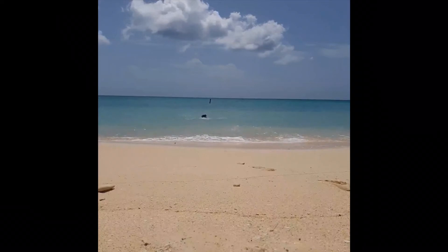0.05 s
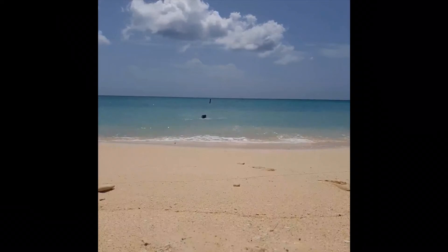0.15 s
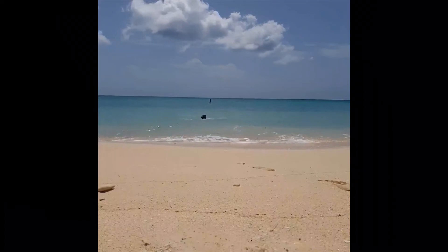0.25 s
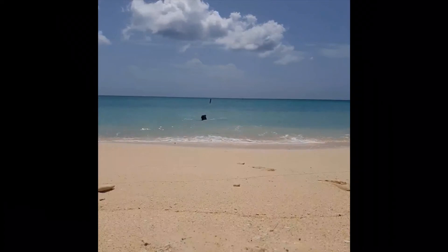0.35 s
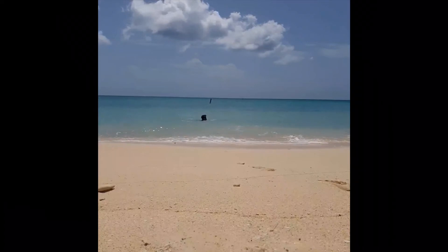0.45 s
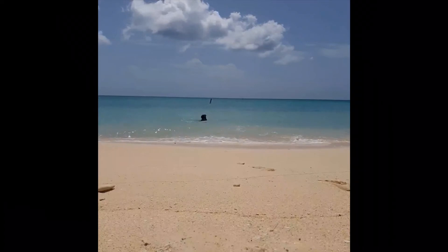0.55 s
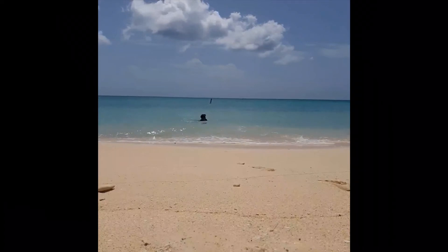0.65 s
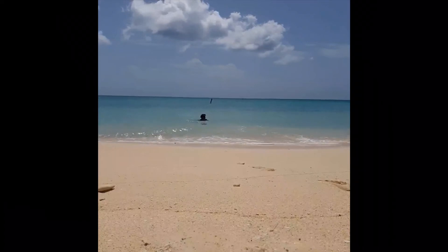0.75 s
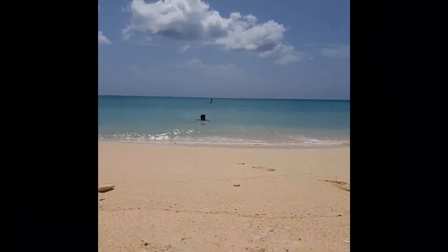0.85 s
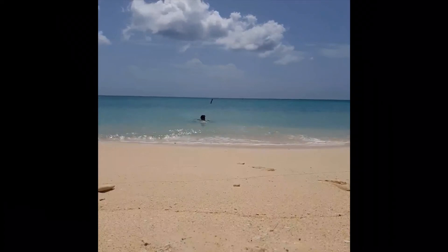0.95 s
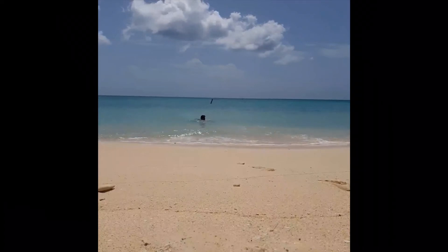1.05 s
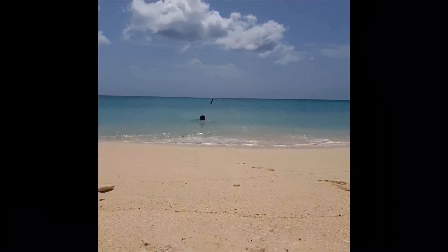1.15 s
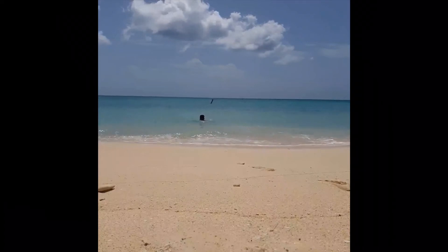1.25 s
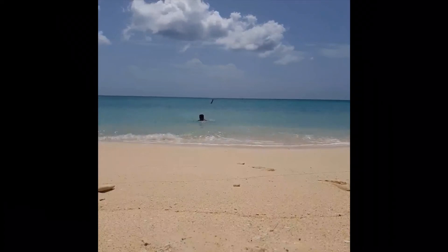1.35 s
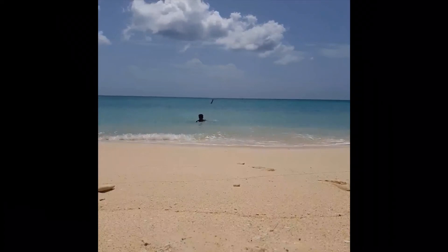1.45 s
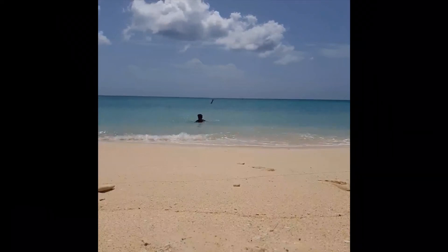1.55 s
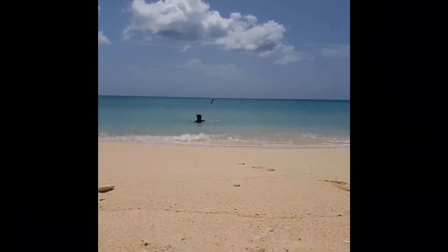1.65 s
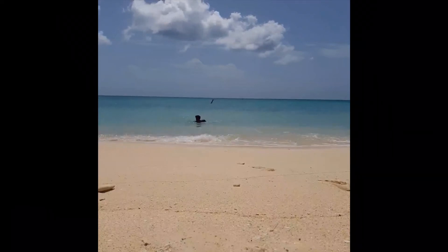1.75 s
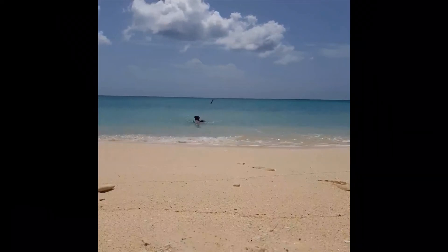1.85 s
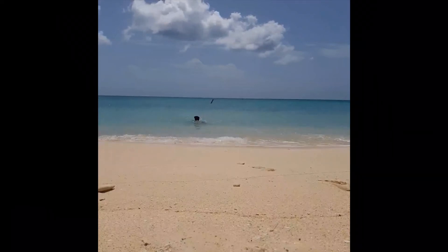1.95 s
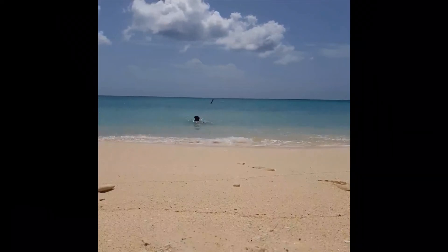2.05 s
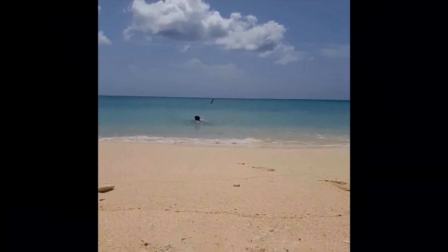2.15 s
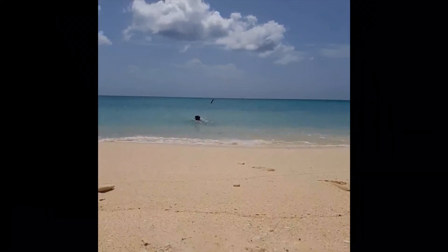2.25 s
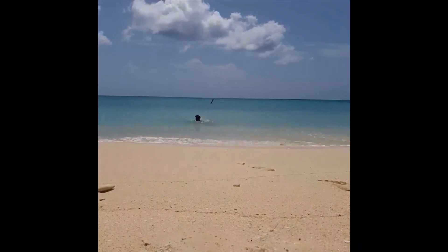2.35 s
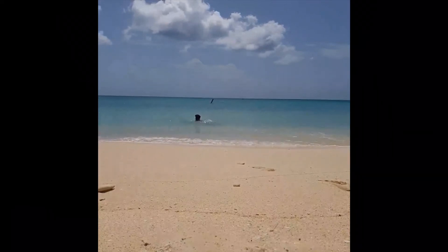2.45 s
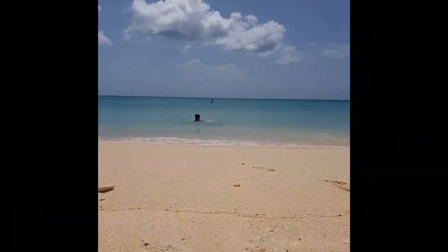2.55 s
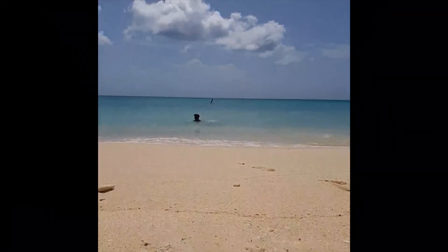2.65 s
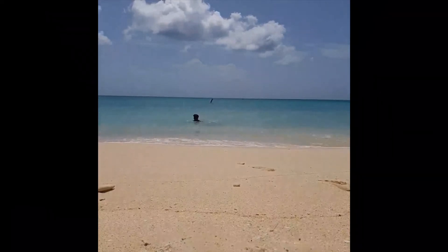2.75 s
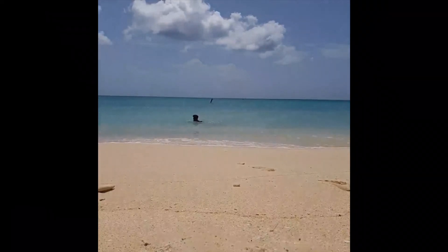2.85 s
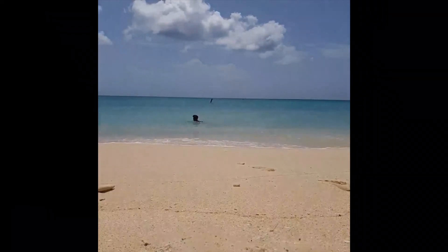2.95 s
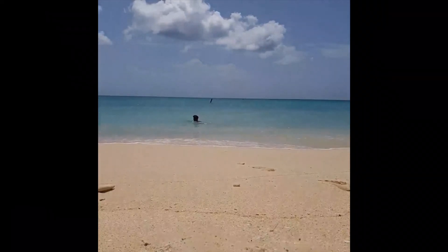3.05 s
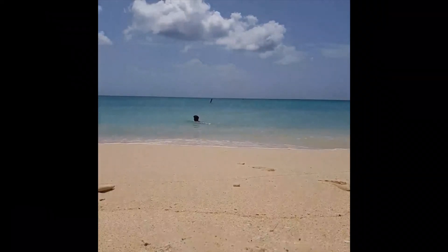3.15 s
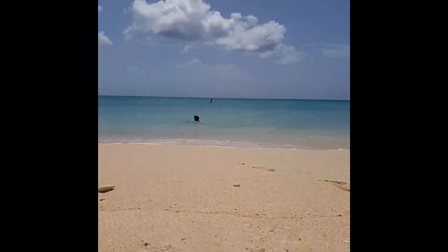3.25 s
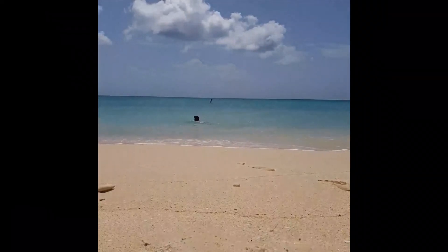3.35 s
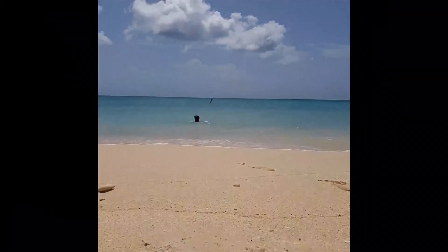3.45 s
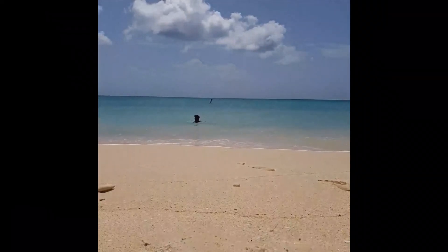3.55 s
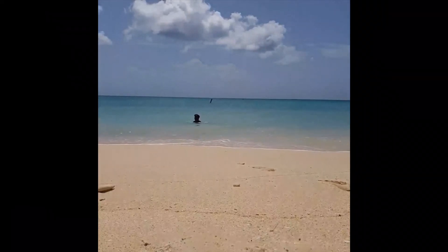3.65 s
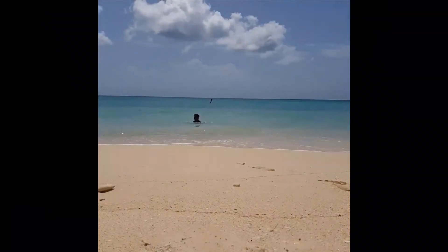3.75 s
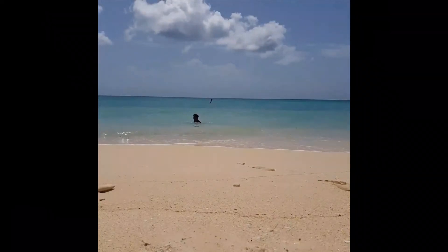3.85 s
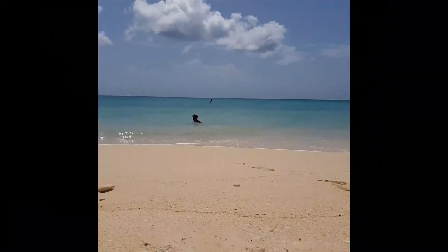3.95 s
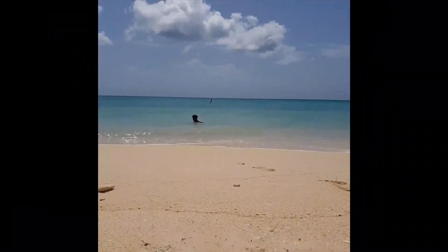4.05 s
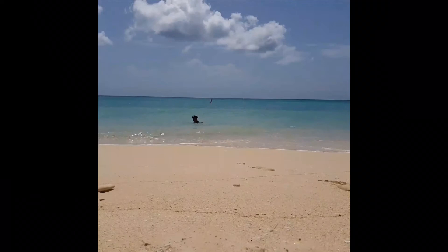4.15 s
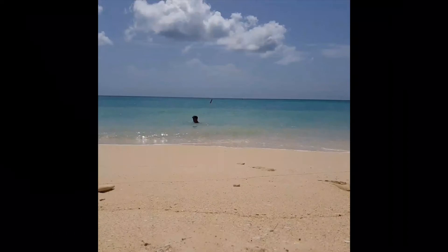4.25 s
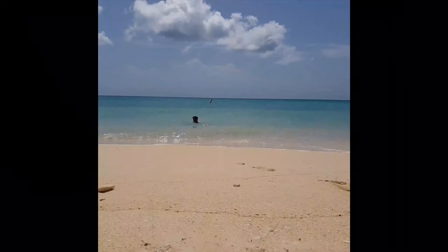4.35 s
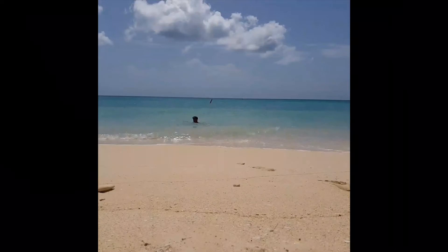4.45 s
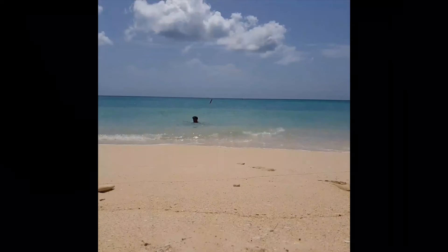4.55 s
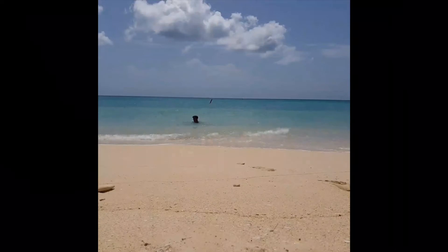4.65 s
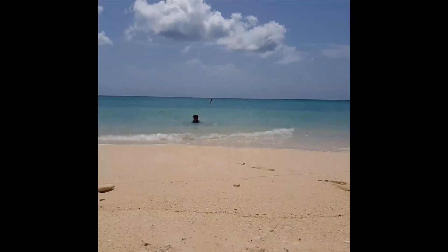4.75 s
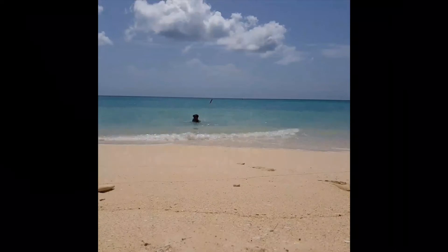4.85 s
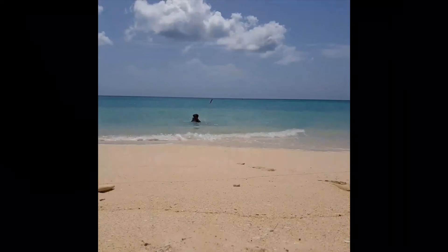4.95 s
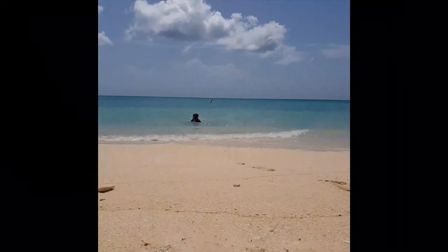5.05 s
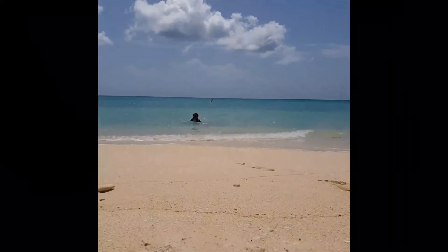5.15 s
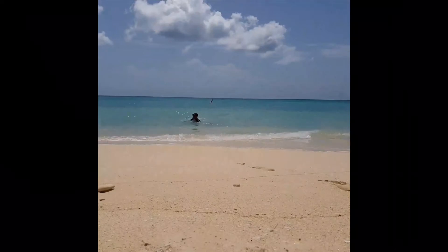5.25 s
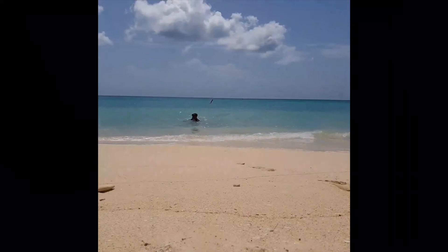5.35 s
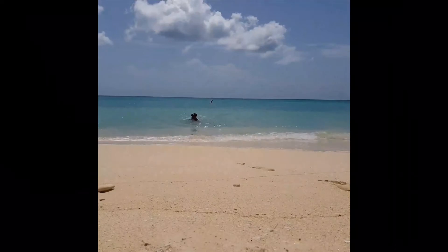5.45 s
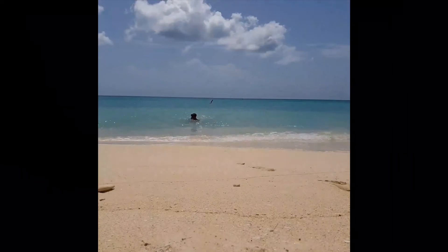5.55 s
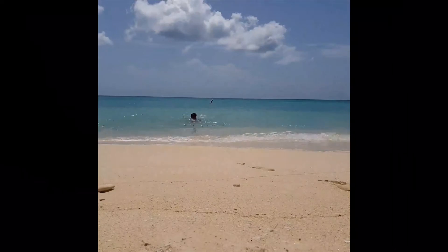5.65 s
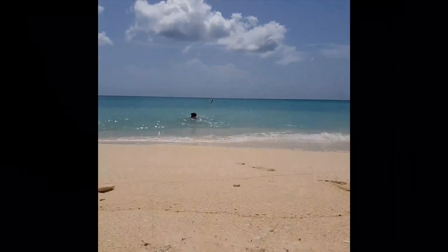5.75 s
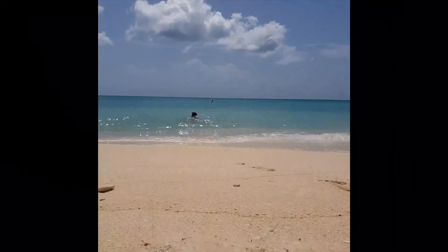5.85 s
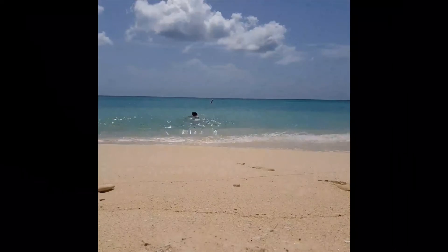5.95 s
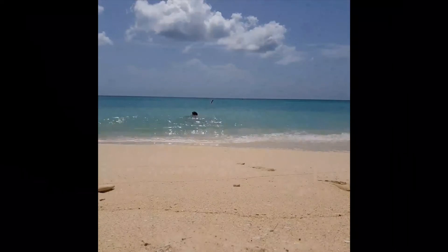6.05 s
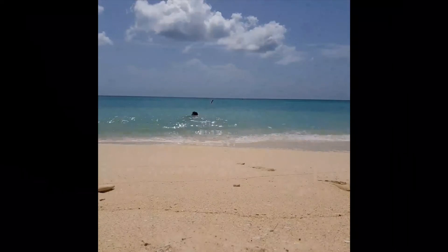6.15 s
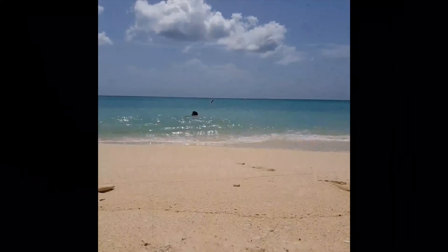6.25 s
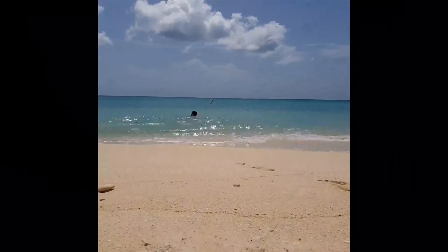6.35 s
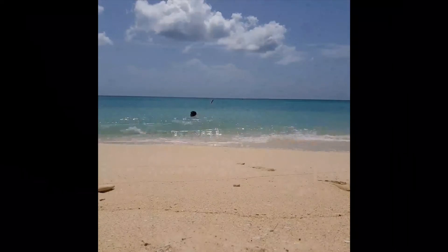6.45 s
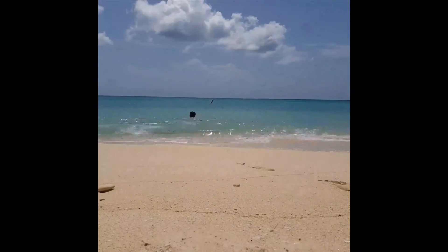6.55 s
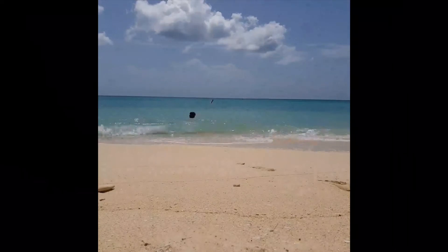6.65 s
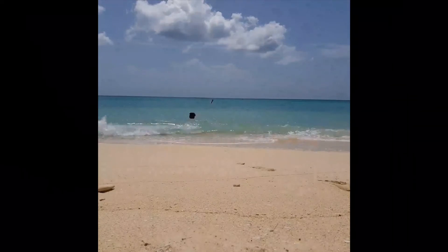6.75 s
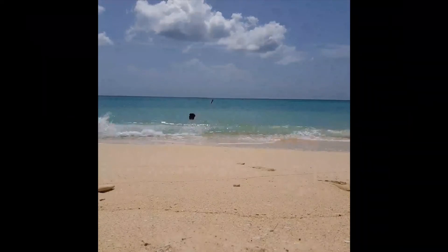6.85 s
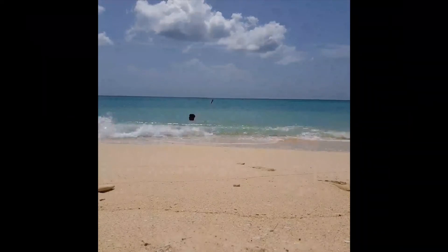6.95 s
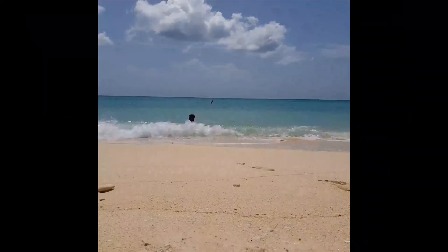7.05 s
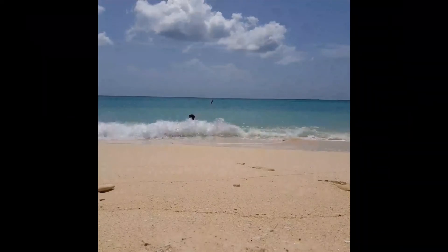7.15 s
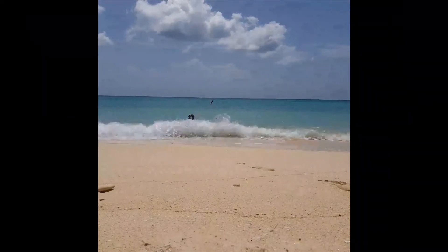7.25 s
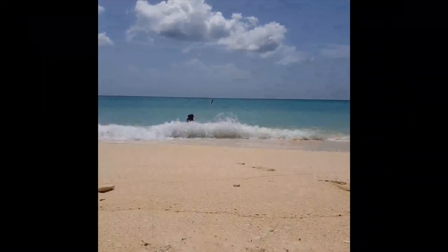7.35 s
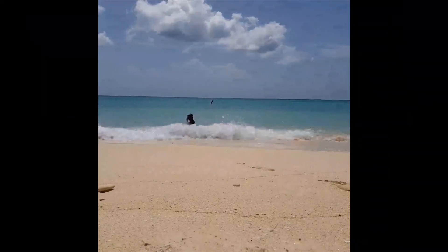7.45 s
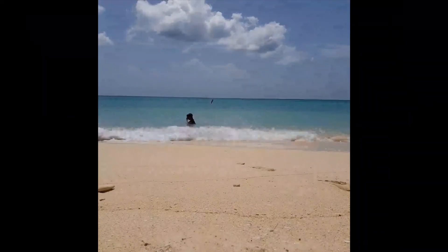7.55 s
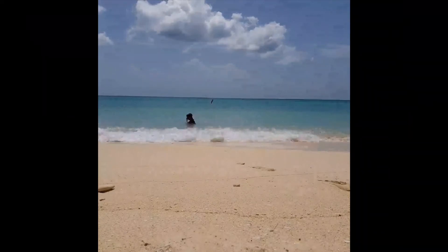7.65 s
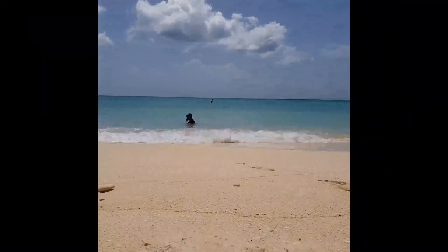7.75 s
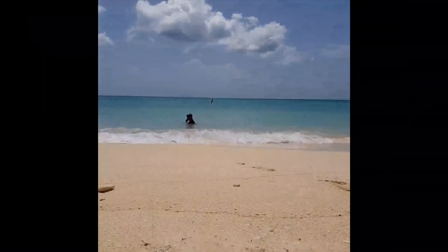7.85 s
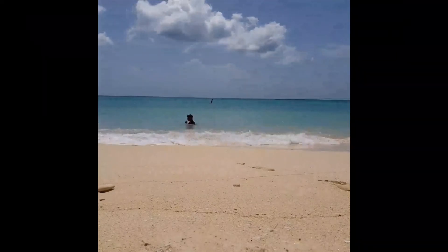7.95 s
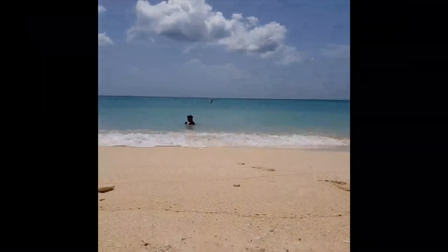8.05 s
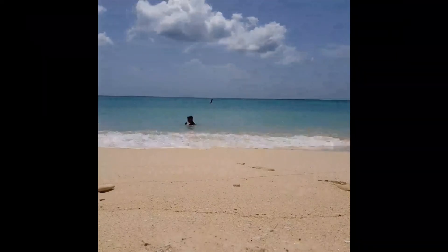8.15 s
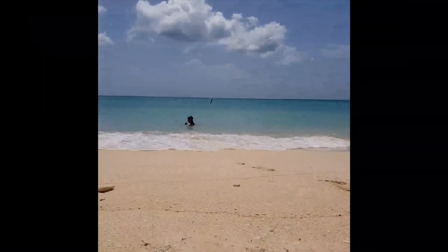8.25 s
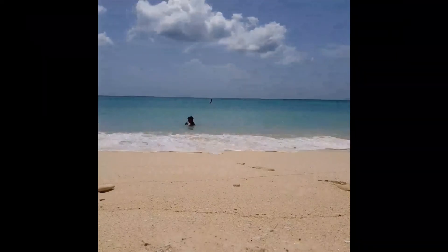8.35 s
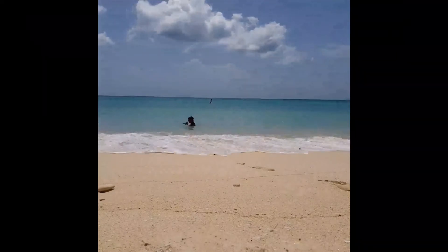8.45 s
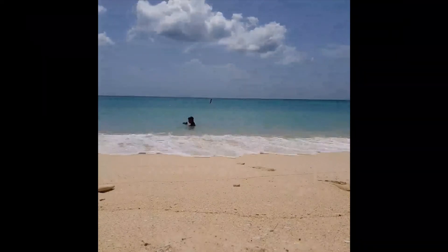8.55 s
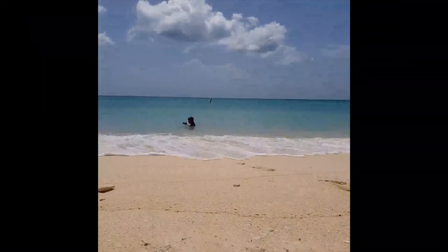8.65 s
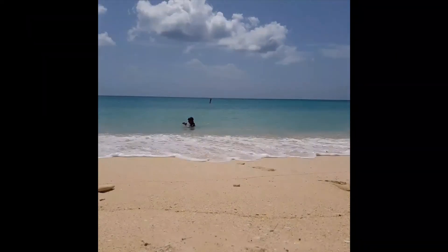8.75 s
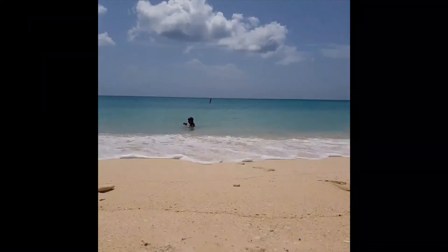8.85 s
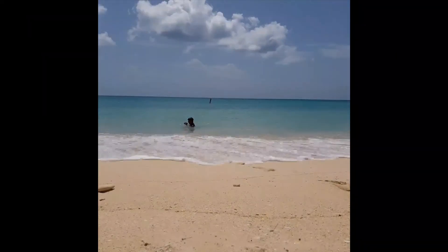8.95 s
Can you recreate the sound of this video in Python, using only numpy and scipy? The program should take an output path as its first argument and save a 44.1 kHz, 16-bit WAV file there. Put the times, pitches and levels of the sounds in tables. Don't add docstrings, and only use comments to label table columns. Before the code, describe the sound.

Small waves wash ashore outdoors, recorded by a phone from the sand. Low rumbling gusts flutter mostly in the left channel near the start. A first wave booms and splashes, recedes to soft distant sea, then a second builds through slaps and thuds to a loud crashing peak. Froth crackles and dries afterward, with faint low boat drones and a short engine rev behind.

```python
import sys
import numpy as np
from scipy import signal
from scipy.fft import rfft, irfft, next_fast_len
from scipy.io import wavfile
from scipy.ndimage import uniform_filter1d, map_coordinates

SR = 44100
rng = np.random.default_rng(int(sys.argv[2]) if len(sys.argv) > 2 else 0)


def amp(db):
    return 10 ** (np.asarray(db, float) / 20)


def write(x):
    x = np.atleast_2d(x).T
    wavfile.write(sys.argv[1], SR, np.round(np.clip(x, -1, 1) * 32767).astype(np.int16))


N = 396900

# frequency in Hz, level in dB per Hz.
FAR_SEA_COLOUR = [(20, -32), (45, -7), (80, -3), (130, 0), (250, -1.5), (500, -16.5), (1500, -23),
                  (6000, -31), (14000, -37)]
# time in seconds, level in dB.
FAR_SEA_LEVEL = [(0, -47), (2.5, -48.5), (4, -46.5), (7.6, -47.5), (8.1, -50.5), (9, -43.5)]
# time in seconds, low hum in Hz, its level in dB, high hum in Hz, its level
# in dB.
ENGINE_HUMS = [(0, 71.2, -62, 95.07, -43), (.5, 72.7, -62, 94.5, -67), (3.8, 72, -69, 94, -68),
               (4.1, 72.4, -54, 94, -64), (4.45, 73, -62, 94.2, -64), (4.7, 73.2, -69, 94.2, -55),
               (5, 73.4, -53, 94.3, -54.5), (5.5, 73.9, -63, 94.5, -52.5), (5.85, 74, -53.5, 96, -57),
               (6.15, 74, -68, 97, -58), (6.45, 74, -51, 97.6, -47), (7, 74.3, -70, 97.8, -47),
               (7.6, 75, -55, 98, -53), (7.9, 68.3, -66, 98.3, -53), (8.05, 64, -58, 98.4, -51),
               (8.4, 63.8, -70, 98.6, -49.5), (9, 70, -62, 99.8, -49)]
# time in seconds, firing rate in Hz, level in dB.
ENGINE_REV = [(8.05, 60.4, -83), (8.2, 63.1, -59), (8.35, 74, -50), (8.47, 83.7, -47), (8.6, 96.7, -47.5),
              (8.7, 106, -48), (8.77, 111.4, -47), (8.84, 114.4, -64), (8.95, 114, -80)]
# multiple of the firing rate, level in dB.
REV_OVERTONES = [(1, -1), (2, -13.5), (3, -14)]
# start in seconds, end in seconds, pitch in Hz, level in dB.
BOAT_DRONES = [
    (1.498, 2.65, 306.6, -52.5),
    (4.096, 4.45, 182, -47.5),
    (6.93, 7.333, 146, -41),
    (8.8, 8.95, 150.5, -43),
]
# time in seconds, gust level in dB.
WIND_GUSTS = [(0, -46), (.47, -34), (.85, -50), (1.5, -51), (1.9, -79), (2.25, -51), (2.75, -47.5),
              (3.1, -56.5), (3.6, -56), (4.1, -70), (4.7, -59), (5.3, -78), (5.9, -66), (6.4, -58),
              (7.4, -49), (7.9, -76), (8.85, -80), (9, -55)]
# frequency in Hz, level in dB per Hz.
WIND_COLOUR = [(15, -34), (40, -5.5), (90, 4), (160, -6.5), (300, -20.5), (600, -20), (2000, -37),
               (5000, -46.5), (9000, -70)]
# time in seconds, peak level in dB, length in seconds.
WIND_EDDIES = [(0.153, -29, .017), (0.259, -31, .017), (0.328, -19, 0.0098), (.34, -23, .008),
               (0.355, -23, .009), (0.375, -32, .008), (0.434, -25, .007), (.443, -21, .008),
               (.459, -23, .012), (.479, -19.5, 0.024), (.493, -18.5, .01), (.511, -26, .009),
               (.535, -22.5, .018), (0.563, -28, .008), (.575, -27, .007), (.587, -16, .008),
               (.596, -29, .007), (0.605, -24, .006), (.624, -30, .008), (.661, -24, .012),
               (0.718, -29, .022), (.745, -31, .012), (.772, -32, .01), (.818, -26, 0.013),
               (0.842, -32.5, .01), (1.293, -34, .021), (2.196, -33, .02), (2.592, -34, .011),
               (2.626, -21.5, 0.0077), (2.659, -29, .013), (2.765, -24.5, 0.025), (2.783, -21, 0.01),
               (2.804, -33, .01), (2.84, -31, .015), (3.017, -32, .012), (3.442, -37, .011),
               (5.861, -29, 0.018), (5.919, -25.5, .014), (7.029, -28, .017), (7.406, -26, 0.013)]
# time in seconds, pitch in Hz, peak level in dB.
FALLING_DROPS = [
    (3.764, 4470, -38),
    (4.091, 6500, -44),
]
# time of widest spread in seconds, level in dB, spreading time in seconds, drying in dB per second.
FROTH_SHEETS = [
    (1.2, -64, 0.43, 19),
    (2.8, -67, 0.62, 1),
    (4.4, -62.5, 0.27, 17),
    (7.5, -52.5, 0.62, 19),
    (8.15, -55.5, 0.44, 6.5),
]
# time in seconds, power of the tumbling breaker in dB, amount of spray in dB.
SURF_LEVELS = [(0, -45, -53.5), (.6, -39, -51.5), (1.0, -39, -48), (1.65, -40.5, -45), (2.5, -49.5, -56),
               (3.45, -53, -61.5), (3.8, -49.5, -58.5), (4.16, -50.5, -55), (4.43, -42.5, -42),
               (5.1, -41, -43.5), (5.75, -36.5, -41), (6.4, -32, -37), (6.85, -32.5, -35),
               (7.47, -30.5, -35.5), (7.72, -39, -43), (7.97, -52.5, -49), (8.5, -54, -55),
               (9, -49.5, -55.5)]
# time in seconds, peak level in dB.
WATER_SLAPS = [(0.1236, -38), (0.3426, -52), (0.7816, -32), (1.1742, -35), (1.258, -41), (1.4536, -28),
               (2.1939, -33), (2.6988, -51), (2.8699, -36), (2.9700, -29.5), (3.1, -34), (3.7638, -39.5),
               (4.0911, -52), (4.4184, -42), (4.6379, -31), (4.7032, -27), (5.2724, -52), (5.6865, -38),
               (6.1165, -42), (6.2412, -26), (6.4333, -31), (6.79, -19), (6.8189, -17), (6.8448, -39),
               (6.965, -27), (7.1806, -32), (7.33, -16), (7.6685, -27), (8.535, -35)]
# time in seconds, peak level in dB.
CREST_THUDS = [(.84, -35), (.98, -37), (1.1, -29), (6.2, -28), (1.21, -31), (1.54, -25.5), (1.64, -25.5),
               (1.94, -33), (2.84, -32.5), (2.97, -33), (4.48, -29.5), (4.8, -29), (5.05, -39), (5.28, -27),
               (5.75, -28), (6.35, -23), (6.81, -18.5), (6.96, -18.5), (7.21, -18.5), (8.54, -37.5)]
# frequency in Hz, level in dB per Hz.
BOOM_COLOUR = [(30, -33), (70, -15), (150, -1.5), (300, 0), (520, -2), (800, -9.5), (1300, -11.5),
               (2500, -71)]
ROAR_COLOUR = [(200, -27), (500, -7), (800, 0.5), (1400, -1.5), (2000, 1), (3200, -17), (6000, -65)]
HISS_COLOUR = [(700, -33), (1500, -0.5), (2300, -3), (3800, -1.5), (5500, -6), (7500, -10), (11000, -19.5)]
FOAM_COLOUR = [(2000, -46.5), (4500, 1), (7000, -1.5), (10000, -0.5), (14000, 4)]
# time in seconds, delay of the right port in microseconds, spread from 0 to 1.
SHORE_BEARING = [(0, 240, .95), (.35, 240, .9), (.55, 236, .6), (.9, 250, .3), (1.1, 232, .25),
                 (1.4, 229, .55), (2.05, 222, .3), (2.55, 228, .5), (2.75, 228, 1), (3.35, 236, 1),
                 (3.5, 234, .5), (3.7, 246, .5), (4.1, 248, .2), (4.25, 228, .65), (4.45, 222, .4),
                 (5.3, 228, .5), (5.5, 230, .75), (5.75, 230, .7), (5.9, 235, .45), (6.9, 233, .45),
                 (7.25, 219, 0), (7.5, 221, .2), (7.65, 228, .3), (7.9, 217, .05), (8.2, 232, .5),
                 (9, 232, .5)]
# frequency in Hz, level in dB, likeness from 0 to 1, phase lag in radians.
RIGHT_PORT = [(30, -.4, .998, 0), (250, -.7, .993, 0), (450, -1, .98, -.02), (620, .8, .94, .11),
              (800, -2, .89, .56), (1290, -8.5, .76, .18), (1500, -7, .77, -.3), (1650, -4.5, .84, .1),
              (1800, -1.6, .95, .3), (1980, -1, .975, .31), (2150, -1.6, .96, .33), (2400, -4.6, .85, .6),
              (3000, -7, .7, 1.8), (4000, -9.3, .62, 2.4), (4500, -11.5, .3, 2.4), (7200, -31, .02, 3.2)]
# frequency in Hz, level in dB.
MICROPHONE = [(20, 1), (1700, -0.5), (1980, -2.5), (2300, -0.5), (7300, 0), (7800, -5.5), (9300, -7.5),
              (11500, -4.5), (14000, -11.5)]
# frequency in Hz, left step as a share of the band's rms,
# right step likewise, step of the weaker of mid and side in dB under the stronger.
ROUNDING_STEPS = [(60, .03, .03, 17), (200, .03, .03, 14), (500, .06, .06, 19), (1000, .17, .2, 14),
                  (1500, .2, .4, 4), (1950, .28, .5, .5), (2400, .28, .6, 0), (4000, .29, .85, 8),
                  (5000, .36, 1.7, 8), (6000, .4, 2.5, 8), (7300, .5, 2.6, 8), (7700, 1.05, 2.6, 8),
                  (11500, .8, 2.6, 8), (12800, 1.3, 2.9, 8)]
BAND_EDGES = np.r_[0:40:4, 40:104:8, 104:144:12, 156, 176, 196, 216, 240, 264, 292, 320:609:32]


def unit(x):
    return x / np.sqrt(np.mean(x ** 2) + 1e-20)


def along(points, hz, column=1):
    table = np.transpose(points)
    return np.interp(np.log(hz + 1), np.log(table[0] + 1), table[column])


def curves(rows):
    s, *columns = np.transpose(rows)
    return [np.interp(np.arange(N) / SR, s, c) for c in columns]


def wobble(rate):
    coarse = np.arange(0, N + 64, 64)
    knots = rng.standard_normal(int(N * rate / SR) + 4)
    return np.interp(np.arange(N), coarse, map_coordinates(knots, [coarse * rate / SR]))


def filtered(x, response):
    m = next_fast_len(N + 8192, real=True)
    return irfft(rfft(x, m) * response(np.fft.rfftfreq(m, 1 / SR)), m)[..., :N]


def rush(colour, patchy_db, grains=0):
    noise = rng.standard_normal((2, N)) + grains
    z = signal.stft(noise.astype(np.float32), nperseg=512)[2]
    field = uniform_filter1d(rng.standard_normal(z.shape[1:]), size=9, axis=0)
    field = uniform_filter1d(field, size=8, axis=1)
    patches = amp(patchy_db * unit(field)).astype(np.float32)
    pair = signal.istft(z * patches, nperseg=512)[1][:, :N]
    return unit(filtered(pair, lambda hz: amp(along(colour, hz))))


def bubbles(count, hz, spread, cycles, scatter_db):
    when = rng.random((2, count, 1))
    size = np.minimum(rng.exponential(1, (count, 1)), 3)
    pitch = np.clip(hz * np.exp(spread * rng.standard_normal((count, 1))), hz / 2, 13000)
    steps = np.arange(int(2 * cycles * SR / hz) + 1)
    age = steps / SR * pitch / cycles
    tone = np.sin(2 * np.pi * cycles * age * (1 + .1 * age))
    ring = amp(scatter_db * size) * tone * age * np.exp(-4 * age)
    spots = (when * N).astype(int) + steps
    return unit(np.array([np.bincount(s.ravel(), ring.ravel(), N + SR)[:N] for s in spots]))


def bumps(events, gain_db, rise, fall):
    kicks, t = np.zeros(N), np.arange(SR // 4) / SR
    for s, db in events:
        kicks[round(s * SR)] = amp(db + gain_db)
    shape = (1 - np.exp(-t / rise)) * np.exp(-t / fall)
    return np.abs(signal.fftconvolve(kicks, shape)[:N])


def turning(hz):
    return 2 * np.pi * np.cumsum(hz) / SR


def far_sea():
    level_db, = curves(FAR_SEA_LEVEL)
    return amp(level_db + 1.5 * wobble(1.23)) * rush(FAR_SEA_COLOUR, patchy_db=2.0)


def hums():
    low_hz, low_db, high_hz, high_db = curves(ENGINE_HUMS)
    low = amp(low_db + 7.0 + 2.9 * wobble(4.8)) * np.sin(turning(low_hz + 2.2 * wobble(9)))
    high = amp(high_db + 2.0 + 2.6 * wobble(3.7)) * np.sin(turning(high_hz + 0.34 * wobble(3.14)))
    return low + high


def rev():
    rev_hz, rev_db = curves(ENGINE_REV)
    firing = turning(rev_hz * (1 + 0.014 * wobble(25)))
    tones = sum(amp(db + 2.5 * wobble(12)) * np.sin(k * firing) for k, db in REV_OVERTONES)
    return amp(rev_db + 6.5) * tones


def drones():
    out, t = np.zeros(N), np.arange(N) / SR
    for start, end, hz, db in BOAT_DRONES:
        swell = np.sin(np.pi * np.clip((t - start) / (end - start), 0, 1)) ** .5
        out += amp(db) * swell * np.sin(turning(hz + 3 * wobble(9)))
    return out


def buffeting():
    gust_db, = curves(WIND_GUSTS)
    lumps = amp(3.6 * wobble(30))
    return amp(gust_db) * unit(lumps * rush(WIND_COLOUR, patchy_db=-3.5)[0])


def eddies():
    out, t = np.zeros(N + SR), np.arange(-4000, 4000) / SR
    for (s, db, length), (phase, sag, odd) in zip(WIND_EDDIES, rng.random((len(WIND_EDDIES), 3))):
        hz = (120 + 0.2 / length) * (1 + 0.09 * (2 * odd - 1))
        swing = np.cos(2 * np.pi * (.9 * hz * t * (1 - 4 * sag * t) + phase))
        swing = swing - 0.3 * (2 * swing ** 2 - 1)
        out[round(s * SR):][:len(t)] += amp(db - 1.0) * np.exp(-(t / (0.51 * length)) ** 2) * swing
    return filtered(out[4000:N + 4000], lambda hz: (1j * hz / (1j * hz + 40)) ** 2)


def drips():
    out, t = np.zeros(N), np.arange(900) / SR
    for s, hz, db in FALLING_DROPS:
        swell = np.sin(np.pi * np.clip(t / 0.0043, 0, 1))
        out[round(s * SR):][:len(t)] += amp(db) * np.sin(2 * np.pi * hz * t * (.9 + 25 * t)) * swell
    return out


def froth():
    out, t = np.zeros(N), np.arange(N) / SR
    for s, db, spreading, drying in FROTH_SHEETS:
        before, after = np.minimum(t - s, 0), np.maximum(t - s, 0)
        out += amp(db - 10 * (before / spreading) ** 2 - drying * after)
    return out


def foam(spray_db, tumble, slaps):
    fresh = amp(-10.5 + 1.077 * spray_db)
    flutter = amp(14 + tumble + .6 * wobble(6) + .9 * wobble(22))
    grains = .3 * bubbles(count=9000, hz=9240, spread=.3, cycles=3, scatter_db=3.0)
    return rush(FOAM_COLOUR, 1.4, grains) * (np.hypot(fresh, froth()) * flutter + amp(-12) * slaps)


def hiss(spray_db, tumble, slaps):
    grains = .3 * bubbles(count=9000, hz=3835, spread=0.498, cycles=5, scatter_db=1.5)
    return rush(HISS_COLOUR, .8, grains) * (amp(spray_db + 7 + tumble + .6 * wobble(9)) + slaps)


def roar(breaker_db, spray_db, tumble):
    roar_db = -8.5 + 0.32 * breaker_db + .55 * spray_db
    slaps = bumps(WATER_SLAPS, gain_db=-20.5, rise=0.0084, fall=0.027)
    grains = 0.27 * bubbles(count=4000, hz=1199, spread=.5, cycles=6.9, scatter_db=1.5)
    return rush(ROAR_COLOUR, 1.3, grains) * (amp(roar_db + 5.5 + tumble + 1.2 * wobble(11)) + slaps)


def boom(breaker_db, tumble):
    thuds = bumps(CREST_THUDS, gain_db=-3.5, rise=.008, fall=0.028)
    return rush(BOOM_COLOUR, patchy_db=0.84) * np.hypot(amp(breaker_db + 1.5 + tumble), thuds)


def surf():
    breaker_db, spray_db = curves(SURF_LEVELS)
    tumble = 0.2 * wobble(5.4) + .5 * wobble(16)
    slaps = bumps(WATER_SLAPS, gain_db=-13.0, rise=0.0035, fall=0.019)
    deep = boom(breaker_db, tumble) + roar(breaker_db, spray_db, tumble)
    return deep + hiss(spray_db, tumble, slaps) + foam(spray_db, tumble, slaps)


def scene():
    shared, own = far_sea() + surf()
    shared_and_boats = shared + hums() + rev() + drones() + drips()
    delay, spread = curves(SHORE_BEARING)
    alike = lambda hz: np.clip(along(RIGHT_PORT, hz, column=2), 0, 1)
    shade = lambda hz: amp(along(RIGHT_PORT, hz))
    lean = np.clip(spread * amp(1.3 * wobble(14)), 0, 1) * np.pi / 2.5
    treble = lambda hz: hz ** 4 / (hz ** 4 + 1100 ** 4)
    shared_high, own_high = filtered(np.array([shared, own]), treble)
    heard = shared_and_boats + (np.cos(lean) - 1) * shared_high + np.sin(lean) * own_high
    lag = (delay + 4 * wobble(9)) * SR / 10 ** 6
    late = map_coordinates(heard, [np.arange(N) - lag], mode="nearest")
    turn = lambda hz: np.exp(-1j * along(RIGHT_PORT, hz, column=3))
    right = filtered(late, lambda hz: shade(hz) * alike(hz) * turn(hz))
    right = right + filtered(own, lambda hz: shade(hz) * np.sqrt(1 - alike(hz) ** 2))
    left = shared_and_boats + buffeting() + eddies()
    return np.array([left, right])


def coarse_rounding(x, pair_db, scatter_db):
    frame, lead = 1024, 1355
    n, k = np.arange(2 * frame)[:, None] + .5, np.arange(BAND_EDGES[-1]) + .5
    basis = np.sin(np.pi * n / (2 * frame)) * np.cos(np.pi / frame * (n + frame / 2) * k)
    basis, x = basis.astype(np.float32), x.astype(np.float32)
    blocks = np.pad(x, ((0, 0), (lead, 2 * frame + -(N + lead) % frame))).reshape(2, -1, frame)
    lines = np.concatenate([blocks[:, :-1], blocks[:, 1:]], axis=2) @ basis
    widths = np.diff(BAND_EDGES)
    rms = lambda v: np.sqrt(np.add.reduceat(v ** 2, BAND_EDGES[:-1], axis=2) / widths + 1e-20)
    wide = lambda v: np.repeat(v, widths, axis=-1)
    swap = lambda v: np.einsum("ab,bfk->afk", np.array([[1, 1], [1, -1]]) / np.sqrt(2), v)
    hz = (BAND_EDGES[:-1] + widths / 2) * SR / (2 * frame)
    left, right, starve_db = (along(ROUNDING_STEPS, hz, column=c) for c in range(1, 4))
    paired = swap(lines)
    gap = rms(paired) / rms(paired)[::-1]
    joint = wide(gap.max(axis=0) > amp(pair_db))
    joint_share = wide(np.where(gap < 1, amp(-starve_db) / gap, left))
    share = np.where(joint, joint_share, wide(np.array([left, right])[:, None]))
    rounded = np.where(joint, paired, lines)
    scatter = amp(scatter_db * (1 + (hz > 7400)) * (rng.exponential(1, gap.shape) - 1))
    step = share * wide(rms(rounded) * scatter)
    rounded = np.sign(rounded) * np.floor(np.abs(rounded / step) ** .75 + .4054) ** (4 / 3) * step
    rounded = rounded * ~(joint & (share > 3.1))
    lines = np.where(joint, swap(rounded), rounded)
    halves = (lines.astype(np.float32) @ basis.T * 2 / frame).reshape(2, -1, 2, frame)
    out = halves[:, 1:, 0] + halves[:, :-1, 1]
    return out.reshape(2, -1)[:, lead - frame:][:, :N]


def low_pass(x):
    return signal.sosfilt(signal.butter(12, 13610, fs=SR, output="sos"), x)


def record(dry):
    mix = filtered(dry, lambda hz: amp(along(MICROPHONE, hz)))
    mix = mix + amp(-77) * rng.standard_normal(dry.shape)
    mix = coarse_rounding(mix, pair_db=6.5, scatter_db=2.6)
    return low_pass(mix)


dry = scene()
out = record(dry)
write(out)
```